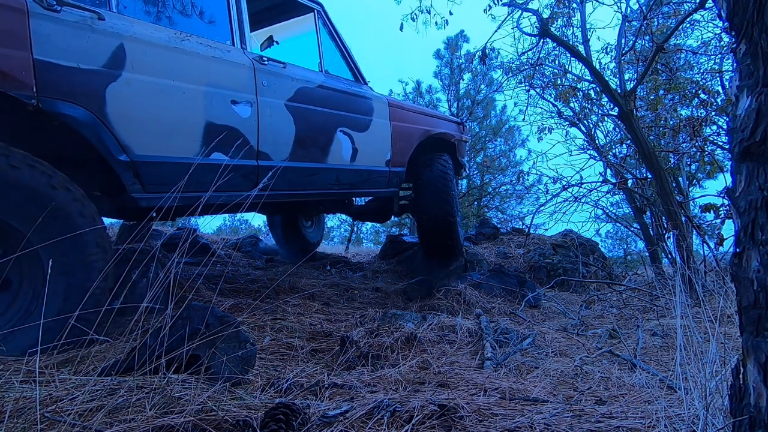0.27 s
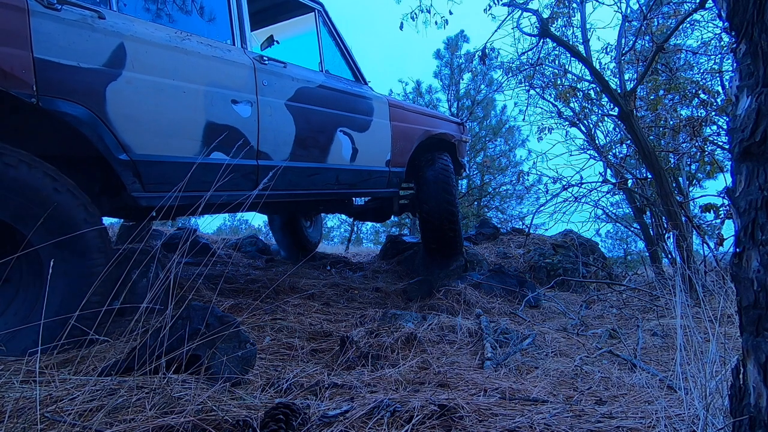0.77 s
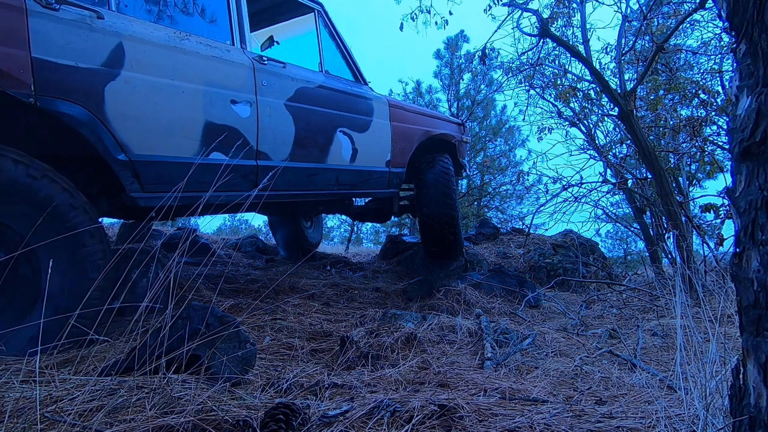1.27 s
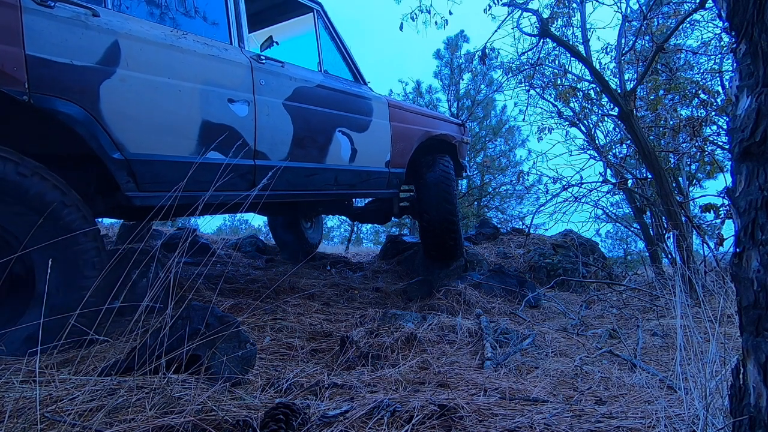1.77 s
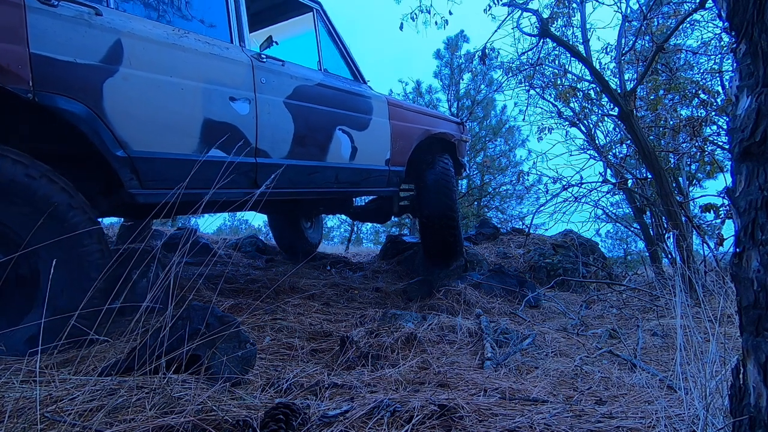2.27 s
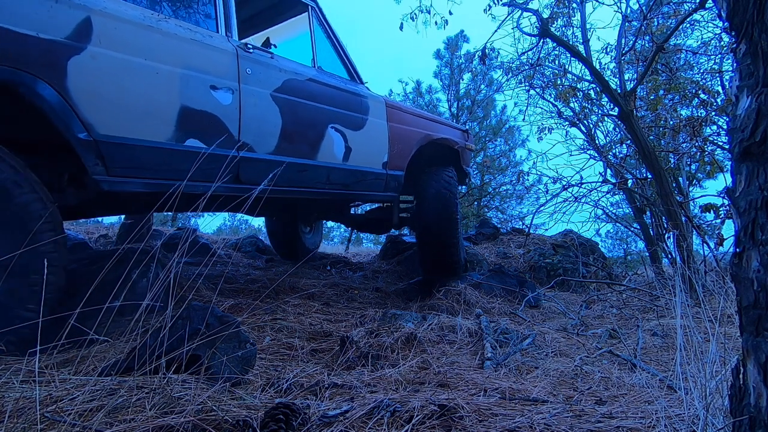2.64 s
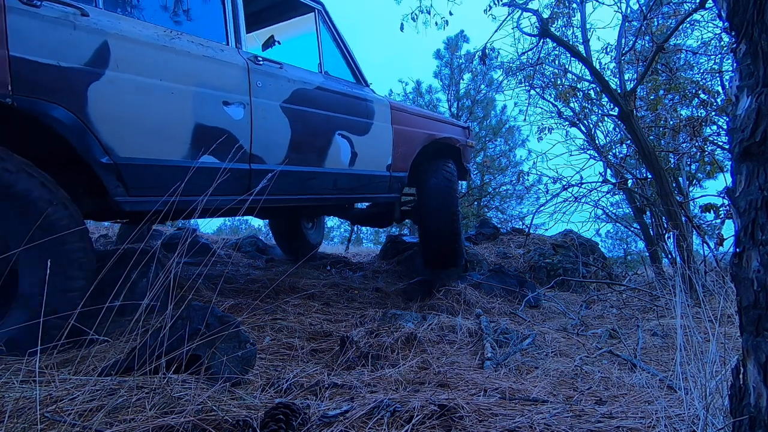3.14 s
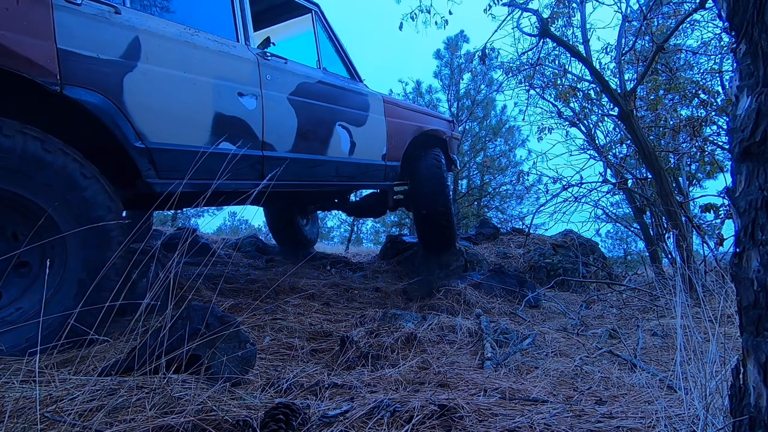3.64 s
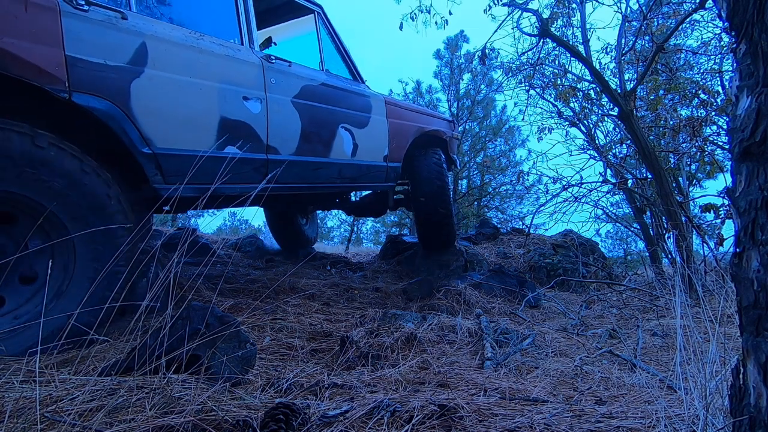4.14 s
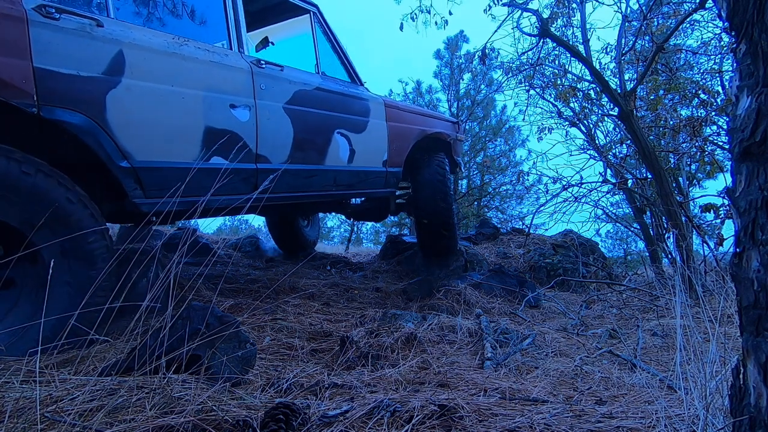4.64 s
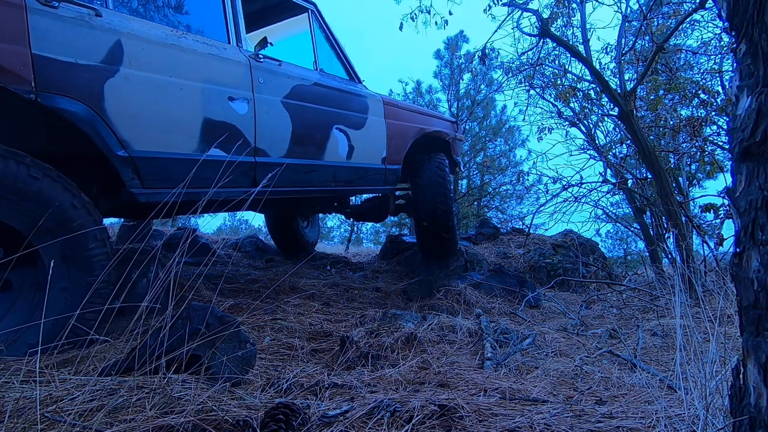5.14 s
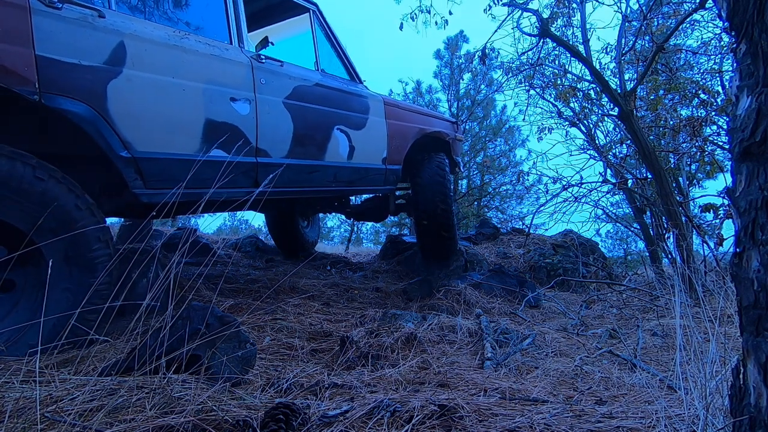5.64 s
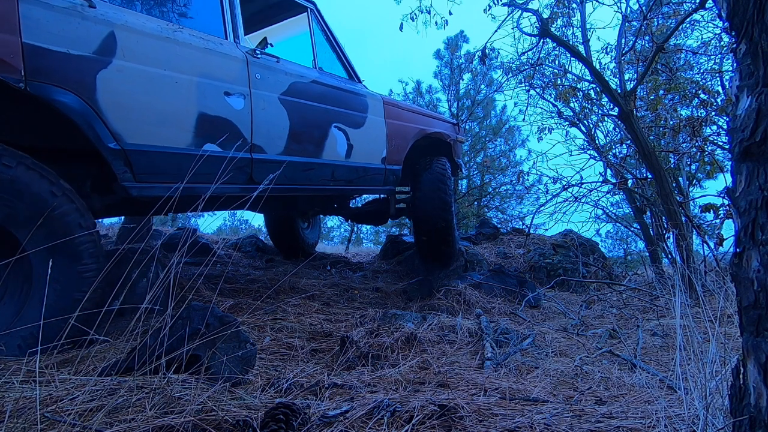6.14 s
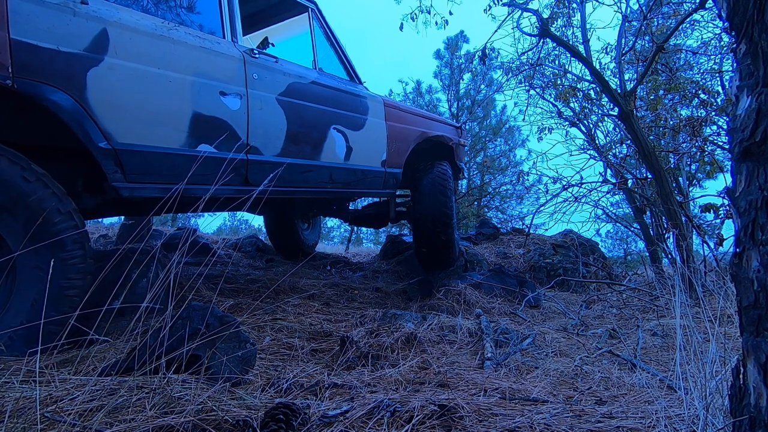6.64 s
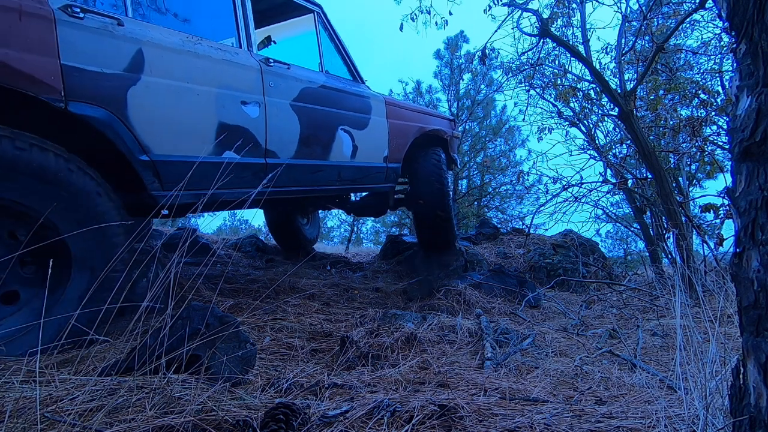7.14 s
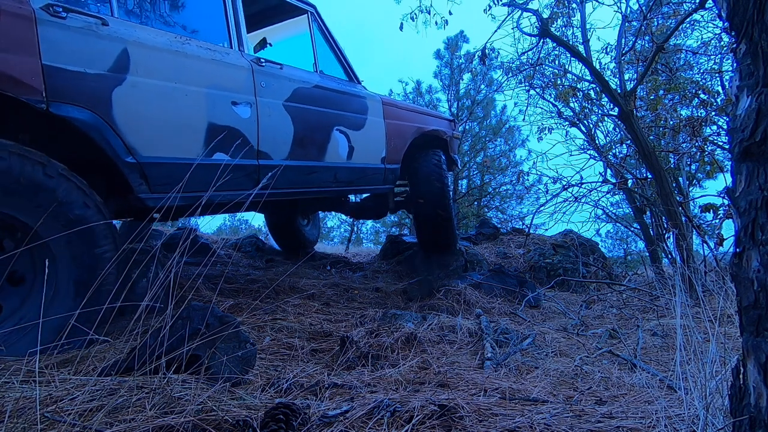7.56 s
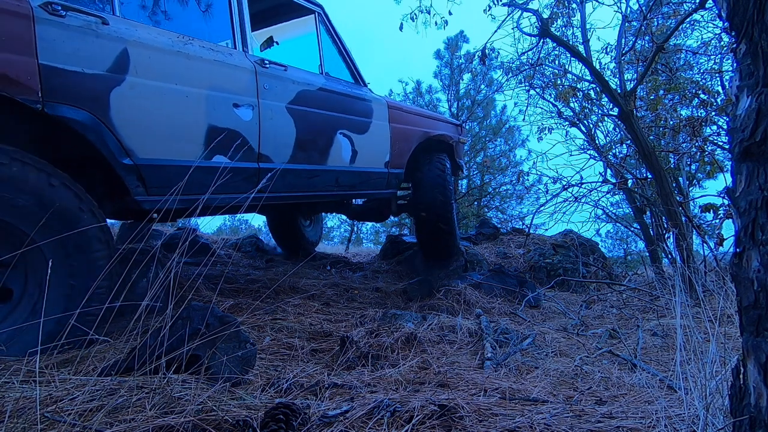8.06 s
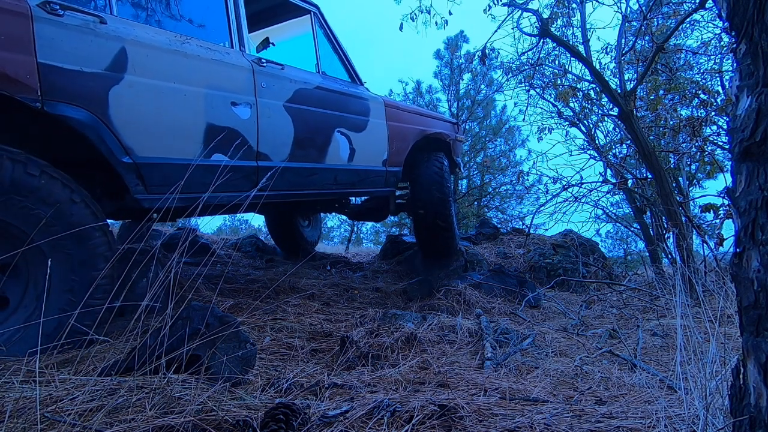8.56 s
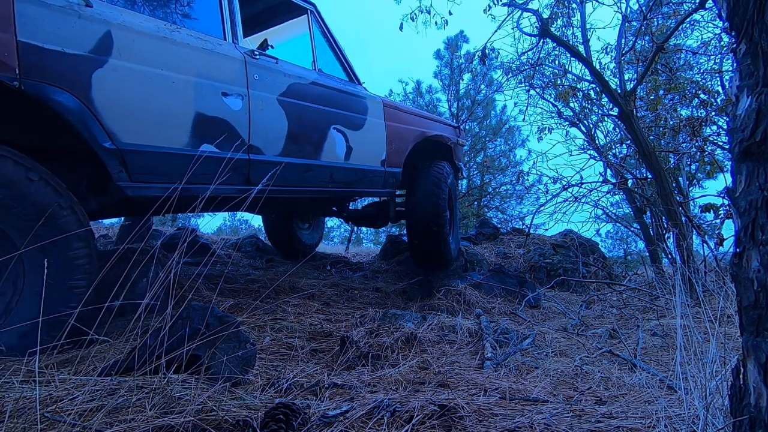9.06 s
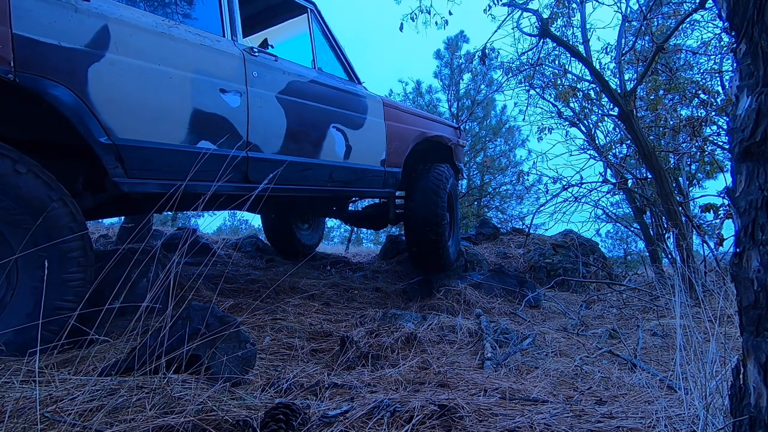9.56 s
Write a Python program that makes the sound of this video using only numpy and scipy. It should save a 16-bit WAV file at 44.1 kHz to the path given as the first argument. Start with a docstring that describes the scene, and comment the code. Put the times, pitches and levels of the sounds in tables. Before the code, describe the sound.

A V8 truck works over rocks in a forest, heard close, dry and in stereo. From 0 to 0.9 s the exhaust roars deep and raspy under throttle, with pops, then runs down by 1.4 s. A short lift near 2 s collapses to lumpy idle around 2.6 s, with metallic clinks. It revs up again from 2.8 s, roaring until 4.5 s, and falls away with pops near 4.7 s. A half-hearted rise at 5.5 s sinks to uneven chugging around 6.0-6.6 s, with clustered stone thuds and linkage clinks. The third, highest pull climbs from 6.8 to 7.9 s, with hard stone clacks at 7.6 and 7.9 s. It then drops, popping at 8.3 s, to a slow loping idle from 9 s with rapid clinks, knocks, faint brake singing and slight pump hiss. Fan rush and sheet-metal buzz follow the revs; grit ticks and brief thin chirps come and go.

```python
"""A forest, where a V8 truck crawls up rocks close by: three long pulls on the throttle, with loping idle between.
Each firing thumps through the exhaust and spits gas noise; the fan rushes and loose sheet metal buzzes,
all louder with speed and throttle. Now and then the exhaust pops, a filtered crack with a spit of noise.
Tyres knock on stones (wavering tones and noise) and snap grit, and a loose linkage clinks on decaying sines.
A brake sings faintly, a steering pump hisses, and thin high chirps come and go."""
import sys
import numpy as np
from scipy.fft import rfft, irfft, next_fast_len
from scipy.io import wavfile
from scipy.ndimage import uniform_filter1d, minimum_filter1d, map_coordinates

SR = 44100
rng = np.random.default_rng(int(sys.argv[2]) if len(sys.argv) > 2 else 0)


def to_wav(sig):
    """Store sig (one row per channel, or 1-D mono) as 16-bit WAV at the path in sys.argv[1].

    Samples outside -1..1 are clipped; the rate is SR.
    """
    pcm = np.clip(np.atleast_2d(sig), -1, 1) * 32767
    pcm = np.round(pcm).astype(np.int16)
    wavfile.write(sys.argv[1], SR, pcm.T)  # frames by channels


N = 432621
TIME = np.arange(N) / SR

# engine speed: time_s, firings_per_s
ENGINE_SPEED = [(0.0, 106.27), (0.45, 105.84), (0.9, 100.45), (0.99, 94.19), (1.17, 64.29), (1.26, 60.9),
                (1.44, 41.29), (1.8, 54.55), (1.98, 67.01), (2.16, 56.38), (2.25, 36.06), (2.61, 24.92),
                (2.7, 30.45), (2.88, 58.88), (3.24, 81.92), (3.6, 90.25), (3.78, 97.09), (4.5, 107.31),
                (4.59, 101.49), (4.77, 65.48), (5.04, 44.74), (5.22, 45.88), (5.58, 61.14), (5.76, 54.11),
                (6.03, 33.31), (6.3, 31.82), (6.66, 36.17), (6.75, 45.7), (6.93, 79.95), (7.29, 98.5),
                (7.47, 112.98), (7.83, 116.08), (7.92, 108.3), (8.1, 73.67), (8.55, 60.86), (8.82, 39.97),
                (9.2, 23), (9.5, 22.8), (9.81, 26.5)]
# cylinders in firing order, with unequal pipes: strength_db, pipe_travel_s, rasp_db
CYLINDERS = [(.3, .0034, -4), (-.6, .0031, -1), (.8, .0012, 4), (-.7, .0031, -1), (.3, .0005, 3),
             (.3, .0006, 3), (.2, .0032, 0), (0, .0027, -2)]
# firing grows uneven towards idle: firings_per_s, strength_scatter_db, timing_scatter_intervals
UNEVEN_FIRING = [(22, 2.8, .09), (33, 1.7, .03), (55, .8, .01), (85, .35, .005)]
# late burning towards idle, a typical straggling puff after each firing: firings_per_s, level_db
AFTERBURN = [(24, -8), (33, -15), (45, -26), (65, -50)]
# tone of the exhaust pipe and silencer: pitch_hz, gain_db
PIPE_TONE = [(10, -39.5), (17, -10), (24, 13), (32, 10), (40, 4), (50, 14.5), (62, 20), (74, 23.5),
             (88, 19.5), (112, 18.5), (140, 11), (180, 6.5), (240, -1), (400, -2.5), (700, -24.5),
             (1500, -77.5)]
# exhaust boom, weaker towards idle: firings_per_s, level_db
BOOM_LEVEL = [(23, -19.5), (33, -15.5), (45, -15.5), (65, -13.5), (110, -10.5)]
# tone of the low gas noise: pitch_hz, gain_db
CHUFF_TONE = [(60, -50), (150, 10.5), (220, -1), (290, -6), (370, -21), (480, -38.5), (650, -30),
              (1500, -55.5)]
# tone of the harsher gas noise: pitch_hz, gain_db
RASP_TONE = [(150, -33), (350, 2.5), (500, 0), (650, -2), (740, 6), (800, 0), (900, 5.5), (1020, -1),
             (1200, -5), (1500, -9.5), (2100, -10.5), (3200, -22.5), (9000, -58)]
# tone of the fan's rush: pitch_hz, gain_db
FAN_TONE = [(300, -8.5), (1200, 0.5), (2500, 3.5), (3500, -2), (4200, -2), (5200, -4.5), (6200, -4.5),
            (7300, -6), (9000, -11.5), (10500, -20), (12500, -28.5), (15000, -41)]
# ringing of the tailpipe at each chug: pitch_hz, width_hz, gain_db
TAILPIPE_MODES = [(204, 128, 4), (294, 83, 3)]
# ringing of the thin end of the pipe: pitch_hz, width_hz, gain_db
PIPE_TIP_MODES = [(730, 26, -3.5), (895, 54, 1.5), (1047, 41, -5.5), (1221, 37, -9)]
# ringing of the loose heat shield at RING_RATE: pitch_hz, width_hz, gain_db
SHIELD_MODES = [(2266, 75, -2.5), (2340, 130, -8.5), (3430, 27, -11.5)]
# ringing of the loose bracket at RING_RATE: pitch_hz, width_hz, gain_db
BRACKET_MODES = [(2920, 48, 3), (4070, 130, -3.5), (4200, 1100, -16.5), (5040, 260, -8)]

# How loud each part runs, one row each:
# level_db at PULL_RATE, speed_db per further firing per second, throttle_db when wide open
# low gas noise
CHUFF_LAW = (-35.5, 0.06, 0.89)
# harsher gas noise
RASP_LAW = (-34, 0.23, 1.9)
# fan
FAN_LAW = (-41, 0.13, 1.9)
# heat shield
SHIELD_LAW = (-49, 0.076, 2.9)
# bracket
BRACKET_LAW = (-49.5, 0.081, 0.66)

# brief changes, mostly dips (each part takes a share of the noise change):
# middle_s, half_length_s, noise_change_db, boom_change_db
LULLS = [(1.42, 0.069, -4.5, -2.5), (2.265, 0.089, -18.5, -8), (2.45, .04, 0.5, -8), (2.6, 0.068, -7, -4),
         (4.715, 0.016, -4.5, -5), (4.98, 0.62, -2, -0.5), (5.92, 0.11, -8, -2), (6.235, 0.055, -3, -2),
         (8.72, .03, 0, -4.5), (8.82, 0.11, -11, -0.5), (8.95, 0.033, -5, -7), (9.12, 0.098, -5, -3.5),
         (9.605, 0.027, -18, -7.5)]
# brief swells, mostly of both noise and boom, at pulls, run-downs and idle:
# middle_s, half_length_s, noise_change_db, boom_change_db
BRIEF_SWELLS = [(1.88, .09, 1.5, 1.5), (2.78, 0.22, 2.5, 1.5), (3.0, 0.51, 4, 2), (4.665, .035, 3.5, 0.5),
                (5.53, 0.11, 1.5, 3), (6.85, 0.2, 5.5, 0.5), (8.2, 0.12, 1, 1.5), (9.27, 0.03, 7, -3),
                (9.73, 0.11, 7.5, 3.5)]
# bouts of changed rattling: start_s, end_s, shield_change_db, bracket_change_db
RATTLE_BOUTS = [(1.104, 2.106, -1, 2), (2.359, 2.715, 5.5, 2.5), (5.05, 5.856, 3.5, 0),
                (6.25, 7.005, 0.5, -3.5), (8.12, 8.72, -2.5, 0)]
# thin chirps: middle_s, pitch_hz, level_db
CHIRPS = [(.065, 8410, -55), (1.742, 6600, -45), (2.565, 7240, -46), (3.21, 7460, -33), (3.28, 7660, -48),
          (4.375, 8450, -48), (4.49, 8650, -55), (4.765, 7150, -41), (5.436, 6430, -42), (7.862, 7500, -40),
          (7.968, 7300, -49), (8.044, 7300, -33.5), (9.514, 7700, -35)]
# sharper exhaust pops: start_s, level_db
POPS = [(.086, -22), (.616, -26), (.694, -25), (1.051, -20), (1.457, -33), (3.464, -24), (3.554, -24),
        (4.281, -21), (4.675, -25), (4.839, -29), (5.205, -28), (5.6, -28), (7.691, -22), (8.035, -24),
        (8.296, -18), (8.464, -27)]
# tyres and axles on stones: start_s, thud_db, hollow_ring_db, clack_db, fall_by_60_db_s
KNOCKS = [(1.497, -30, -52.5, -41, 0.18), (1.861, -33, -37.5, -48, 0.063),
          (1.999, -36, -41.5, -26.5, 0.059), (2.543, -26, -36.5, -40.5, 0.063),
          (5.079, -24.5, -51.5, -41, .05), (5.124, -23, -48.5, -43, .05), (5.424, -21, -45.5, -43, 0.092),
          (6.089, -30, -53.5, -50.5, 0.1), (6.125, -24, -54.5, -41.5, 0.045), (6.218, -30, -43, -41, 0.091),
          (6.28, -24.5, -53, -53.5, .2), (6.343, -21.5, -39.5, -30.5, 0.023),
          (6.429, -33.5, -41.5, -42.5, 0.21), (6.49, -25.5, -50.5, -43.5, 0.092),
          (6.581, -25, -50.5, -40.5, 0.08), (7.579, -26.5, -25.5, -18, 0.18),
          (7.839, -38, -39, -25.5, 0.25), (7.875, -22, -19.5, -22, 0.19), (8.294, -30, -36, -37, 0.05),
          (8.69, -34.5, -50, -44.5, 0.038), (8.906, -26.5, -41, -43.5, 0.086),
          (9.029, -34.5, -56, -43, .12), (9.109, -27, -32.5, -43.5, 0.13), (9.389, -26, -53, -42.5, 0.14),
          (9.792, -23, -38.5, -38, 0.31)]
# tone of the hollow underbody: pitch_hz, gain_db
HOLLOW_TONE = [(150, -22.5), (280, -11.0), (360, 0.0), (440, -1.5), (560, -7.0), (800, -19.5), (3000, -55.5)]
# tone of a stone's clack: pitch_hz, gain_db
CLACK_TONE = [(250, -19.5), (650, -1.0), (1000, 2.5), (1500, -4.0), (2200, -6.5),
              (4000, -15.0), (8000, -24.5), (14000, -51.5)]
# clinks of the linkage: start_s, strength_db
CLINKS = [(2.31, -42.5), (2.693, -38), (2.745, -27.5), (5.1, -40.5), (5.205, -35.5), (5.291, -41.5),
          (5.507, -38), (5.923, -44), (6.311, -39.5), (6.37, -39.5), (6.457, -35), (6.55, -35),
          (6.606, -33), (6.754, -30.5), (8.686, -38.5), (8.875, -42.5), (8.963, -41), (9.096, -40.5),
          (9.225, -38), (9.275, -41), (9.37, -39), (9.418, -53), (9.46, -46), (9.509, -31), (9.548, -37.5),
          (9.634, -31), (9.678, -32.5), (9.713, -32.5), (9.754, -41), (9.788, -39)]
# ringing of the loose steel linkage at RING_RATE: pitch_hz, gain_db, fall_by_60_db_s
LINKAGE_MODES = [(2305, 0, .08), (2400, -6, .06), (2880, -7, .08), (3470, -11, .08), (4000, -6, .08),
                 (4840, -16, .07), (5650, -20, .07), (6380, -20, .07)]
# tone of the scrape in each clink: pitch_hz, gain_db
SCRAPE_TONE = [(1000, -21.5), (2200, -2), (4300, -2.5), (6000, -5), (9000, -13.5), (14000, -43)]
# brake squeal: start_s, end_s, partial_number, typical_level_db
SQUEALS = [(2.32, 2.43, 4, -53), (9.05, 9.81, 1, -61.5), (9.38, 9.72, 2, -56.5), (9.4, 9.72, 3, -60.5),
           (9.42, 9.58, 4, -61.5)]
# steering-pump hiss: start_s, end_s, level_db
HISSES = [(2.424, 2.558, -57.5), (6.097, 6.158, -56.5), (8.97, 9.07, -59.5), (9.115, 9.409, -56.5)]
# tone of the steering-pump hiss: pitch_hz, gain_db
HISS_TONE = [(4500, -24.5), (5700, -3.5), (6000, 2), (6300, -16), (8000, -43.0)]
# likeness of left and right noise: pitch_hz, likeness (1 is identical)
STEREO_LIKENESS = [(300, 1), (520, .85), (720, .4), (830, .9), (1050, .8), (1370, .25), (1600, .6),
                   (1900, .3), (2200, .62), (3800, .7), (5000, .55), (7000, .25), (12000, .2)]
# how much louder the left is: pitch_hz, left_over_right_db
STEREO_BALANCE = [(25, .7), (125, .1), (280, -.3), (430, -3.5), (520, -1), (660, 9), (760, 8.5), (970, 2),
                  (1200, 6.3), (2700, 4.6), (4500, 2.3), (6300, 0), (8000, -5), (9500, 2.5), (12000, -1.5)]
# how far the left leads: pitch_hz, lead_radians
STEREO_LEAD = [(25, -.33), (125, -.13), (300, 0), (430, .4), (600, 1.7), (720, 2.2), (780, 4.4), (900, 5.5),
               (1100, 6.5), (1300, 6.9), (1430, 5.2), (1700, 6.4), (1950, 4.7), (2400, 6.2), (3100, 5.8),
               (4800, 6.7), (6500, 8), (9000, 10.2)]

PULL_RATE = 100  # firings per second at which levels and widths are given
# throttle: smoothing, and the run-up that nearly opens it fully (octaves per s)
THROTTLE_LAG_S, FULL_RUN_UP = 0.041, 1.66
# pulse width at PULL_RATE, and the power by which it widens with the firing interval
PULSE_S, PULSE_WIDENS = 0.0011, .6
# crank position at the start (firings), place of the chuff's peak in the engine cycle (0-1)
CRANK_START, CHUFF_PLACE = 1.08, .53
CHUFF_THROB_DB, RASP_THROB_DB = 6.5, 3.3  # swing up and down once per engine cycle
# chug over the chuff, lead in firings, fading below PULL_RATE (dB per firing per second)
CHUG_DB, CHUG_LEAD, CHUG_GROWS_DB = -2.5, .7, .22
STEADY_GAS = 2  # gas flow between firings, beside spurts of rms 1
RASP_SCATTER_DB, SHAKE_SCATTER_DB = 2.2, 4.8
CRACK_S, CRACK_DB, CRACK_SCATTER_DB = .00008, -6, 1.5
# loose parts ring higher with speed: reference firings per second, power of the speed
RING_RATE, RING_RISES = 50, .065
# steady change in the buzz through the scene (dB per s)
SHIELD_DRIFT, BRACKET_DRIFT = 0.93, -0.18
RATTLE_FADE_S = 0.036
POP_SPIT_DB, POP_T60_S = -7, .03
# grit: ticks per second; lowest level at PULL_RATE, spread, growth per further firing per second
GRIT_RATE = 9
GRIT_DB, GRIT_SPREAD_DB, GRIT_GROWS_DB = -40.5, 2, .16
THUD_HZ, THUD_WAVER_HZ, THUD_ATTACK_S = 188.5, 44.7, 0.0026
SCRAPE_DB, CLINK_T60_S = -6.5, 0.043
BRAKE_HZ = 1645
TOP_HZ = 15000


def amp(db):
    """Turn decibels into a plain gain."""
    return 10 ** (np.asarray(db) / 20)


def unit(x):
    """Scale a signal to rms 1."""
    return x / np.sqrt(np.mean(x ** 2) + 1e-20)


def along(points, hz):
    """Read a curve of points on a log axis."""
    f, v = np.transpose(points)
    return np.interp(np.log(hz + 1), np.log(f + 1), v)


def curves(rows):
    """Give one value per sample for each column after the time."""
    s, *cols = np.transpose(rows)
    return [np.interp(TIME, s, c) for c in cols]


def wobble(rate):
    """Draw a smooth random curve with this many knots a second."""
    knots = rng.standard_normal(int(N * rate / SR) + 4)
    return map_coordinates(knots, [TIME * rate])


def filtered(x, response):
    """Multiply the spectrum of x by a response of frequency."""
    m = 2 * next_fast_len(N // 2 + SR // 4)
    hz = np.fft.rfftfreq(m, 1 / SR)
    return irfft(rfft(x, m) * response(hz), m)[..., :N]


def causal(points, hz):
    """Give a response with these gains that rings only after it is struck."""
    cepstrum = irfft(np.log(amp(along(points, hz))))
    half = len(cepstrum) // 2
    return np.exp(rfft(np.r_[cepstrum[0], 2 * cepstrum[1:half], np.zeros(half)]))


def colour(points):
    """Make a response from a tone table."""
    return lambda hz: amp(along(points, hz))


def panel(modes):
    """Sum the resonances of a ringing part, with every second one reversed."""
    def response(hz):
        total = 0
        for k, (centre, width, db) in enumerate(modes):
            damping = 1j * hz * width
            total = total + (-1) ** k * amp(db) * damping / (centre * centre - hz * hz + damping)
        return total
    return response


def noise(response, gate=1):
    """Pass gated stereo noise through a response; the middle has rms 1."""
    def spread(hz):
        turn = np.arccos(np.clip(along(STEREO_LIKENESS, hz), -1, 1)) / 2
        return response(hz) * np.array([np.cos(turn), np.sin(turn)])
    mid, side = filtered(gate * rng.standard_normal((2, N)), spread)
    return np.array([mid + side, mid - side]) / np.std(mid)


def puffs(times, widths, sizes):
    """Add pulses that rise fast and die away, each with its own width in s."""
    index = (times * SR).astype(int)[:, None] + np.arange(1, 2048)
    u = (index / SR - times[:, None]) / np.abs(widths)[:, None]
    pulses = sizes[:, None] * u * np.exp(-u)
    return np.bincount(np.maximum(index, 0).ravel(), pulses.ravel(), N)[:N]


def blows(rows, attack):
    """Make the envelope of blows: start_s, level_db, fall_by_60_db_s."""
    out, t = np.zeros(N + SR), np.arange(SR // 3) / SR
    for s, db, t60 in rows:
        out[round(s * SR):][:len(t)] += amp(db - 60 * t / t60) * (1 - np.exp(-t / attack))
    return out[:N]


def held(start, end, fade):
    """Make an envelope that opens after start and closes by end."""
    return np.clip(np.minimum(TIME - start, end - TIME) / fade, 0, 1)


def swells(rows):
    """Make smooth level changes in dB, one curve for the noise and one for the boom."""
    total = 0
    for s, half, noise_db, boom_db in rows:
        total = total + np.outer([noise_db, boom_db], np.exp(-((TIME - s) / half) ** 2))
    return total


def throttle_of(rate):
    """Read the throttle from the speed: towards -1 running down, 0 steady, towards 1 running up."""
    run_up = np.gradient(np.log2(rate)) * SR
    smooth = uniform_filter1d(run_up, size=max(int(THROTTLE_LAG_S * SR), 1))
    return np.tanh(smooth / FULL_RUN_UP)


def firings(rate, crank):
    """Give the time, interval, strength and raspiness of each firing."""
    number = np.arange(int(crank[0]) + 1, int(crank[-1]) + 1)
    db, travel, rasp_db = np.array(CYLINDERS)[number % len(CYLINDERS)].T
    chance = rng.standard_normal((len(number), 3))
    speed = np.interp(number, crank, rate)
    at, scatter_db, jitter = np.transpose(UNEVEN_FIRING)
    uneven_number = number + np.interp(speed, at, jitter) * chance[:, 0]
    times = np.interp(uneven_number, crank, TIME) + travel
    strength = amp(db + np.interp(speed, at, scatter_db) * chance[:, 1])
    return times, 1 / speed, strength, amp(rasp_db + RASP_SCATTER_DB * chance[:, 2])


def exhaust_boom(rate, times, interval, strength, boom_swell_db):
    """Pressure pulses, and late puffs near idle, ring the pipe; their loudness is then set by speed."""
    width = PULSE_S * (interval * PULL_RATE) ** PULSE_WIDENS
    lateness, late_size = rng.random((len(times), 2)).T
    late_times = times + interval * (.3 + .4 * lateness)
    late_sizes = 2 * late_size * amp(along(AFTERBURN, 1 / interval))
    pulses = puffs(times, width, strength) + puffs(late_times, width / 2, late_sizes)
    boom = filtered(-pulses, lambda hz: causal(PIPE_TONE, hz))
    power = uniform_filter1d(uniform_filter1d(boom ** 2, size=5000), size=4000)
    levelled = boom / np.sqrt(np.abs(power) + 1e-12)
    return levelled * amp(along(BOOM_LEVEL, rate) + boom_swell_db)


def chugs(rate, crank):
    """Two firings crowd into one pipe each cycle and knock the tailpipe once, harder at speed."""
    at = np.arange(len(CYLINDERS) * CHUFF_PLACE - CHUG_LEAD, crank[-1] - 1, len(CYLINDERS))
    times = np.interp(at, crank, TIME)
    below_pull = np.minimum(np.interp(at, crank, rate) - PULL_RATE, 0)
    sizes = amp(CHUG_GROWS_DB * below_pull + rng.standard_normal(len(times)))
    return unit(filtered(puffs(times, np.full(len(times), .0006), sizes), panel(TAILPIPE_MODES)))


def exhaust_chuff(rate, crank, flow, cycle):
    """Low gas noise spurts with each firing and throbs once a cycle, with a chug on top."""
    gas = noise(colour(CHUFF_TONE), (0.83 + flow) * amp(CHUFF_THROB_DB * cycle))
    return amp(CHUG_DB) * chugs(rate, crank) + gas


def exhaust_rasp(times, raspiness, flow, cycle):
    """Harsh gas noise spurts with each firing, whose sharp crack rings the thin end of the pipe."""
    sizes = raspiness * amp(CRACK_SCATTER_DB * rng.standard_normal(len(times)))
    snaps = puffs(times, np.full(len(times), CRACK_S), sizes)
    tip_ring = unit(filtered(snaps, panel(PIPE_TIP_MODES)))
    pipe_ring = unit(filtered(snaps, lambda hz: causal(RASP_TONE, hz)))
    gas = noise(colour(RASP_TONE), (STEADY_GAS + flow) * amp(RASP_THROB_DB * cycle))
    return gas + amp(CRACK_DB) * (tip_ring + 0.59 * pipe_ring)


def fan(flow):
    """The fan rushes as wavering noise, pulsing slightly with the firings."""
    return amp(1.45 * wobble(25)) * noise(colour(FAN_TONE), 3.2 + flow)


def ring_pitch(rate):
    """Give the pitch ratio of the loose parts at this engine speed."""
    return (rate / RING_RATE) ** RING_RISES


def gliding(response, gate, pitch):
    """Glide the pitch of resonant noise by playing it on a clock that speeds up and slows."""
    clock, samples = np.cumsum(pitch) / pitch.mean() - 1, np.arange(N)
    steady = noise(lambda hz: response(hz / pitch.mean()), np.interp(samples, clock, gate))
    return np.array([map_coordinates(side, [clock], mode="nearest") for side in steady])


def loose_part(modes, rate, times, interval):
    """Each firing shakes a loose part by a random amount, and it buzzes at its resonances."""
    sizes = amp(SHAKE_SCATTER_DB * rng.standard_normal(len(times)))
    shaking = unit(puffs(times, 0.33 * interval, sizes))
    return gliding(panel(modes), 0.03 + shaking, ring_pitch(rate))


def engine():
    """One speed curve drives the exhaust pulses, their gas noise, the fan and the shaken loose parts."""
    rate, = curves(ENGINE_SPEED)
    throttle = throttle_of(rate)
    noise_swell_db, boom_swell_db = swells(LULLS) + swells(BRIEF_SWELLS)

    def level(law, swell_share):
        """Give the gain of a part at this speed and throttle."""
        pull_db, speed_db, throttle_db = law
        running_db = pull_db + speed_db * (rate - PULL_RATE) + throttle_db * throttle
        return amp(running_db + swell_share * noise_swell_db)

    crank = np.cumsum(rate) / SR + CRANK_START  # counted in firings
    times, interval, strength, raspiness = firings(rate, crank)
    flow = unit(puffs(times, 0.28 * interval, raspiness))
    cycle = np.cos(2 * np.pi * (crank / len(CYLINDERS) - CHUFF_PLACE))

    boom = exhaust_boom(rate, times, interval, strength, boom_swell_db)
    chuff = level(CHUFF_LAW, swell_share=0.85) * exhaust_chuff(rate, crank, flow, cycle)
    rasp = level(RASP_LAW, swell_share=0.53) * exhaust_rasp(times, raspiness, flow, cycle)
    rush = level(FAN_LAW, swell_share=0.83) * fan(flow)

    bouts_db = 0
    for start, end, *dbs in RATTLE_BOUTS:
        bouts_db = bouts_db + np.outer(dbs, held(start, end, RATTLE_FADE_S))
    drift_db = np.outer([SHIELD_DRIFT, BRACKET_DRIFT], TIME - TIME.mean())
    shield_db, bracket_db = bouts_db + drift_db
    shield = loose_part(SHIELD_MODES, rate, times, interval)
    bracket = loose_part(BRACKET_MODES, rate, times, interval)
    buzz = (level(SHIELD_LAW, swell_share=0.34) * amp(shield_db) * shield
            + level(BRACKET_LAW, swell_share=0.34) * amp(bracket_db) * bracket)
    return boom + chuff + rasp + rush + buzz


def grit():
    """Twigs and small stones tick at random, dull or bright, harder as the engine runs faster."""
    rate, = curves(ENGINE_SPEED)
    out = 0
    for hz in (1300, 3600):
        chance = rng.random((round(GRIT_RATE * N / SR / 2), 2))
        rows = []
        for when, size in chance:
            db = GRIT_DB + GRIT_SPREAD_DB * min(-np.log(size), 3)
            rows.append((when * N / SR, db, .025))
        tone = [(hz / 4, -30), (hz, 0), (2 * hz, -14), (3 * hz, -40), (5 * hz, -70)]
        out = out + noise(colour(tone)) * blows(rows, attack=.0005)
    return out * amp(GRIT_GROWS_DB * (rate - PULL_RATE))


def chirps():
    """Each thin chirp is a short sine that swells, fades and wavers in pitch."""
    out = np.zeros(N)
    waver = np.cumsum(wobble(350)) / SR
    for s, hz, db in CHIRPS:
        near = slice(max(round((s - .05) * SR), 0), round((s + .05) * SR))
        t = TIME[near] - s
        tone = np.sin(2 * np.pi * (hz * t + 110 * waver[near]))
        out[near] += amp(db) * np.exp(-(t / 0.014) ** 2) * tone
    return out


def pops():
    """Now and then the exhaust cracks harder: it spits gas noise and rings the pipe's tip."""
    start, db = np.transpose(POPS)
    cracks = puffs(start, np.full(len(start), CRACK_S), amp(db))
    ring = filtered(cracks, panel(PIPE_TIP_MODES))
    spit_rows = [(s, peak + POP_SPIT_DB, POP_T60_S) for s, peak in POPS]
    spit = noise(colour(RASP_TONE)) * blows(spit_rows, attack=.0005)
    return ring * amp(db.max()) / np.abs(ring).max() + spit


def stone_knocks():
    """Stones thud and clack under the tyres, and the underbody rings hollow."""
    start, thud_db, ring_db, clack_db, t60 = np.transpose(KNOCKS)
    pitch = THUD_HZ + THUD_WAVER_HZ * wobble(150)
    thud = np.sqrt(2) * np.sin(2 * np.pi * np.cumsum(pitch) / SR)
    ring = noise(colour(HOLLOW_TONE))
    clack = noise(colour(CLACK_TONE))
    return (thud * blows(zip(start, thud_db, t60), attack=THUD_ATTACK_S)
            + ring * blows(zip(start, ring_db, t60), attack=THUD_ATTACK_S)
            + clack * blows(zip(start, clack_db, t60), attack=0.0006))


def linkage():
    """Each clink scrapes the loose linkage and rings its modes, never twice quite alike."""
    out, t = np.zeros(N + SR), np.arange(SR // 4) / SR
    hz, mode_db, t60 = np.array(LINKAGE_MODES).T[..., None]
    for s, db in CLINKS:
        pitch = ring_pitch(np.interp(s, *np.transpose(ENGINE_SPEED)))
        detune, force, phase = rng.standard_normal((3, len(LINKAGE_MODES), 1))
        mode_hz = hz * pitch * (1 + 0.0044 * detune)
        fading = amp(mode_db + 2 * force - 60 * t / t60)
        ring = fading * np.sin(2 * np.pi * mode_hz * t + 2 * np.pi * phase)
        out[round(s * SR):][:len(t)] += amp(db - 0.5) * ring.sum(axis=0) * (1 - np.exp(-t / 0.002))
    scrape_rows = [(s, db + SCRAPE_DB, CLINK_T60_S) for s, db in CLINKS]
    return out[:N] + noise(colour(SCRAPE_TONE)) * blows(scrape_rows, attack=0.0011)


def brake():
    """The brake sings on partials of one pitch, wavering in pitch and strength."""
    out = np.zeros(N)
    waver = np.cumsum(wobble(350)) / SR
    for start, end, partial, db in SQUEALS:
        grip = amp(db + 3 * wobble(45)) * held(start, end, fade=.04)
        out += grip * np.sin(2 * np.pi * partial * BRAKE_HZ * (TIME + 0.0044 * waver))
    return out


def steering_pump():
    """The steering pump hisses as a narrow band of noise, opened for short spells."""
    opening = sum(amp(db) * held(start, end, fade=0.018) for start, end, db in HISSES)
    return noise(colour(HISS_TONE)) * opening


def scene():
    """All sounds share one stereo place: left and right differ in loudness and timing by pitch."""
    truck = engine() + grit() + chirps() + pops() + stone_knocks() + linkage() + brake() + steering_pump()
    sides = np.array([[.5], [-.5]])

    def placing(hz):
        turn = np.exp(1j * sides * along(STEREO_LEAD, hz))
        return amp(sides * along(STEREO_BALANCE, hz)) * turn
    return filtered(truck, placing)


def record(dry):
    """A limiter holds the peaks down, then everything from TOP_HZ up is cut."""
    needed = np.minimum(1, amp(-7.0) / (np.abs(dry).max(axis=0) + 1e-9))
    gain = uniform_filter1d(minimum_filter1d(needed, size=700), size=500)
    return filtered(dry * gain, lambda hz: hz < TOP_HZ)


dry = scene()
out = record(dry)
to_wav(out)
```